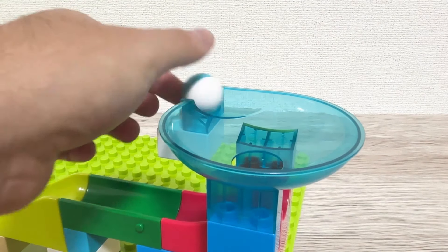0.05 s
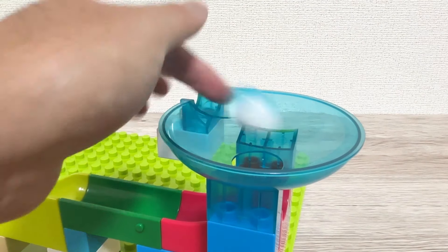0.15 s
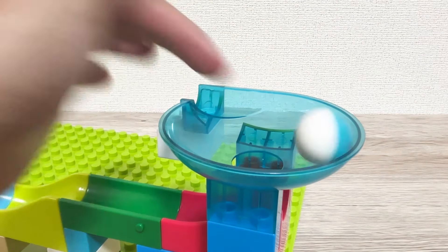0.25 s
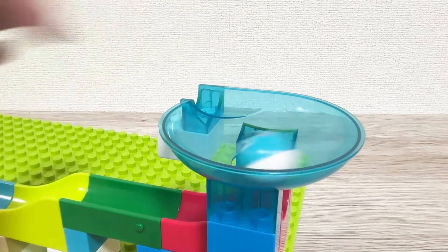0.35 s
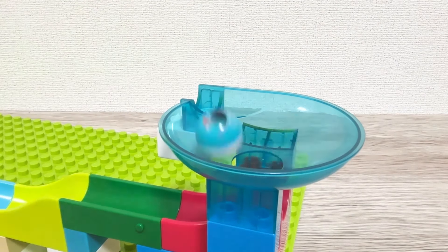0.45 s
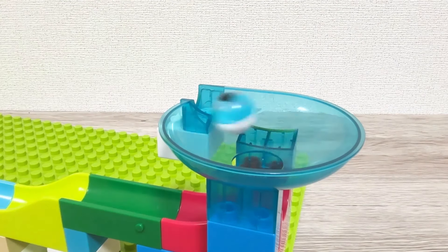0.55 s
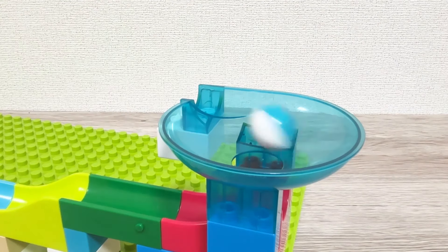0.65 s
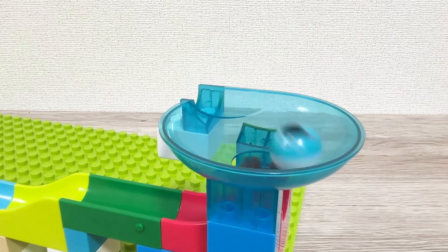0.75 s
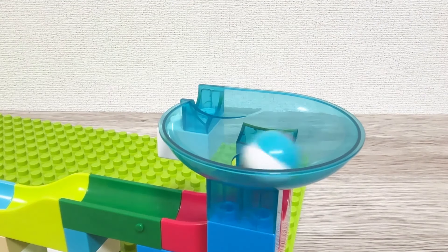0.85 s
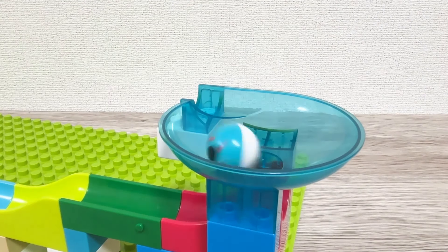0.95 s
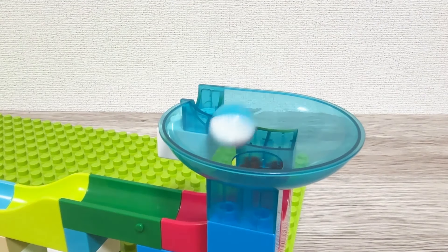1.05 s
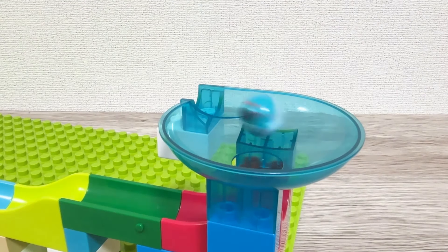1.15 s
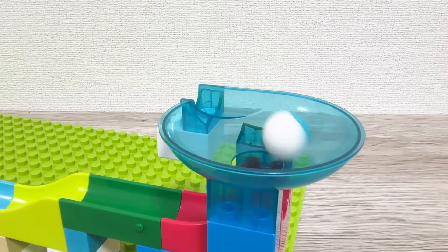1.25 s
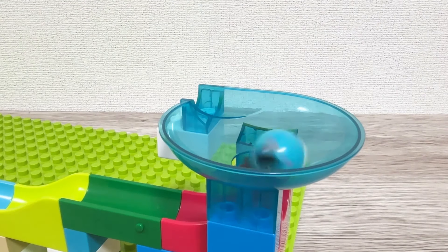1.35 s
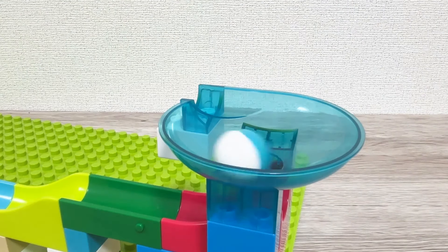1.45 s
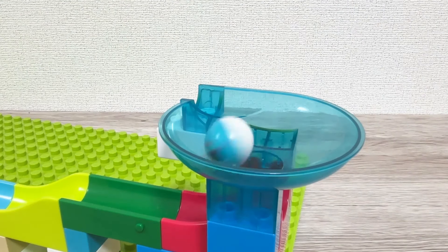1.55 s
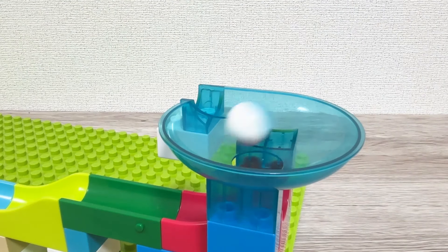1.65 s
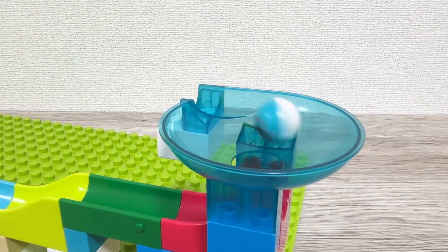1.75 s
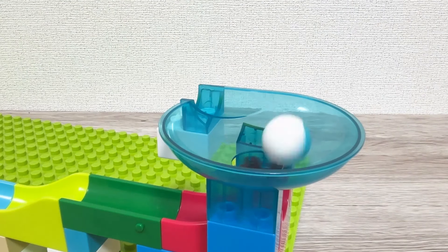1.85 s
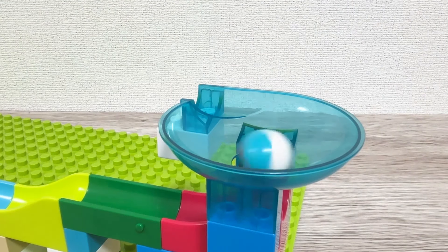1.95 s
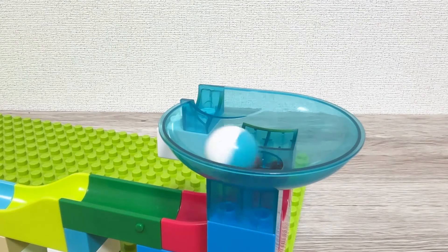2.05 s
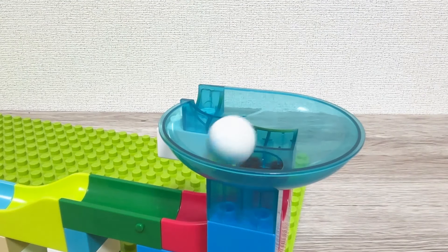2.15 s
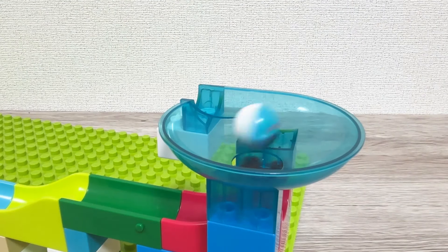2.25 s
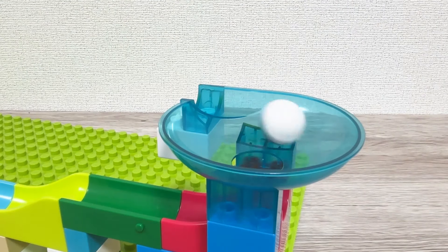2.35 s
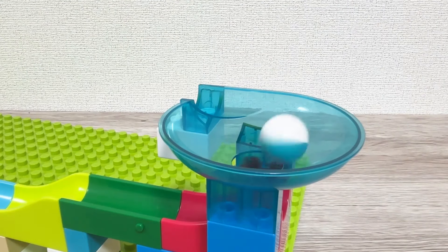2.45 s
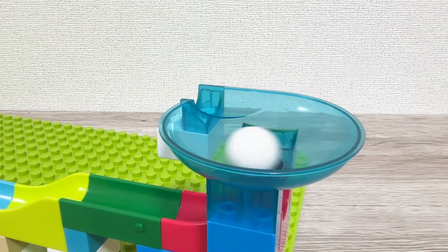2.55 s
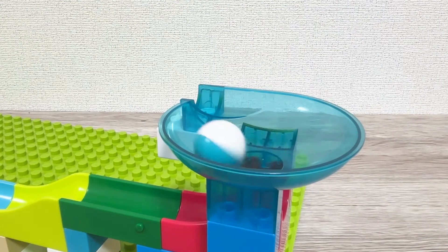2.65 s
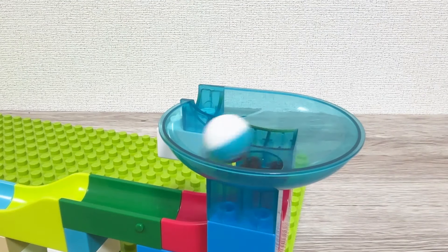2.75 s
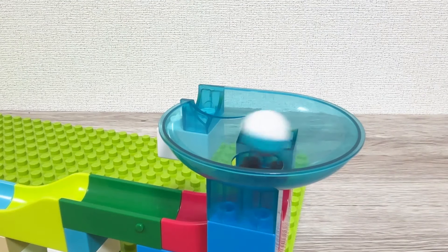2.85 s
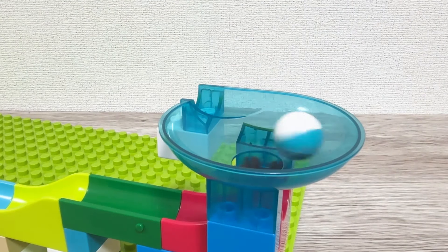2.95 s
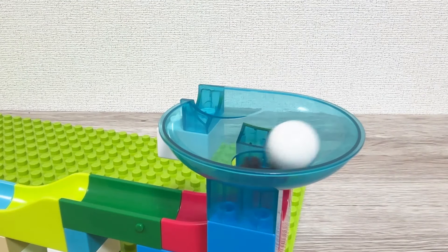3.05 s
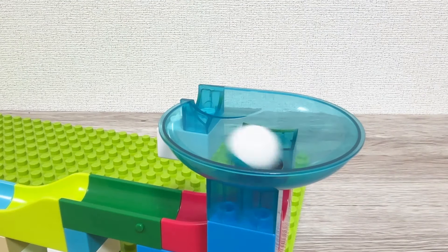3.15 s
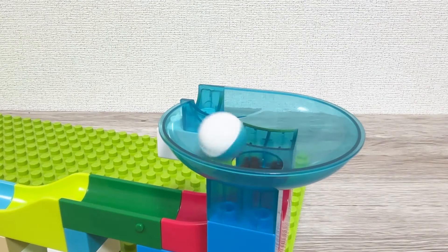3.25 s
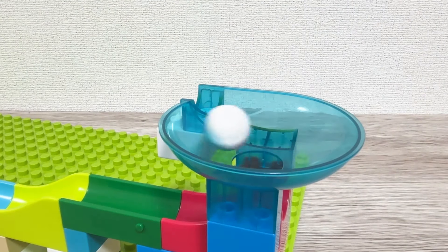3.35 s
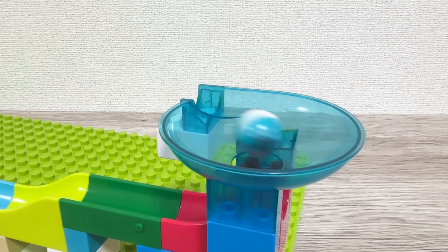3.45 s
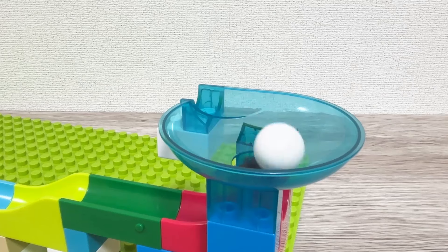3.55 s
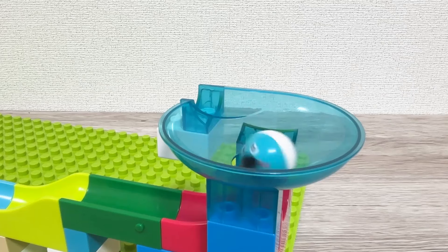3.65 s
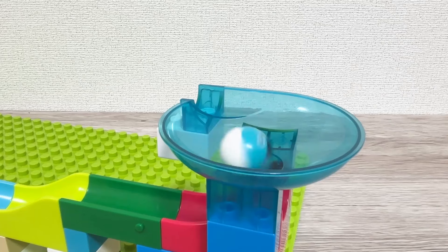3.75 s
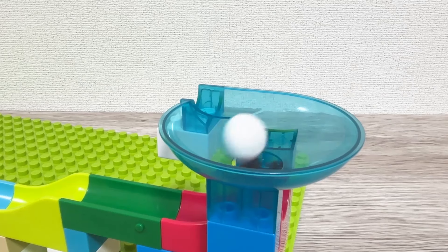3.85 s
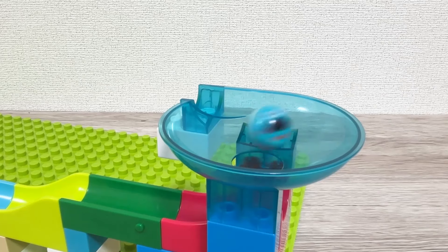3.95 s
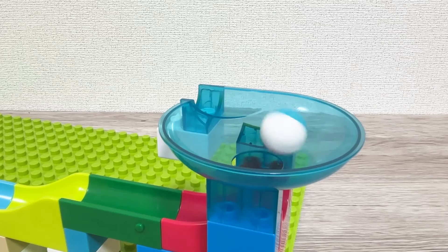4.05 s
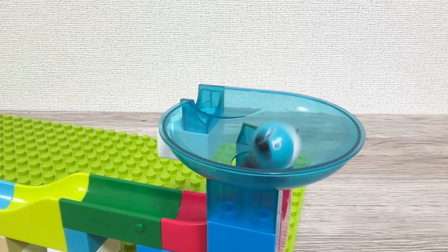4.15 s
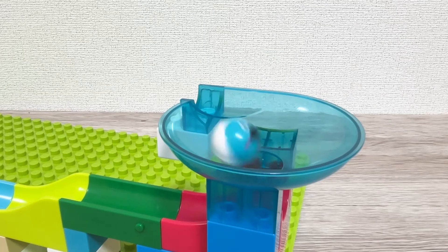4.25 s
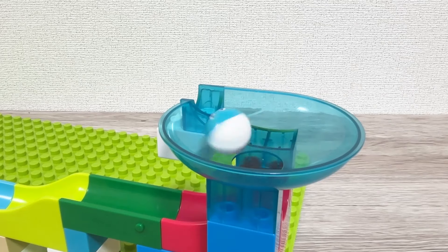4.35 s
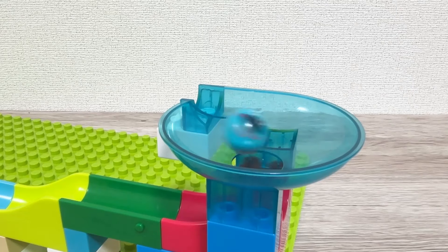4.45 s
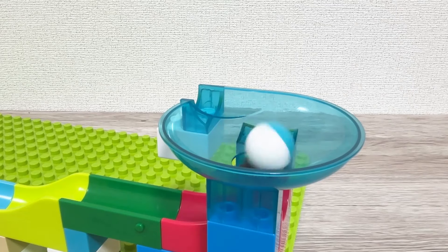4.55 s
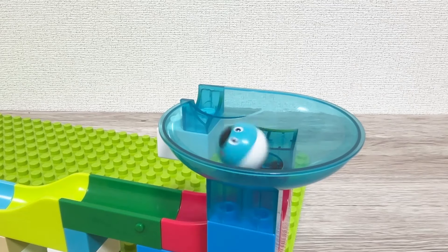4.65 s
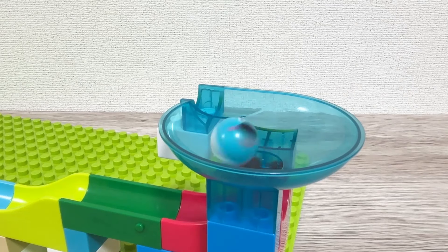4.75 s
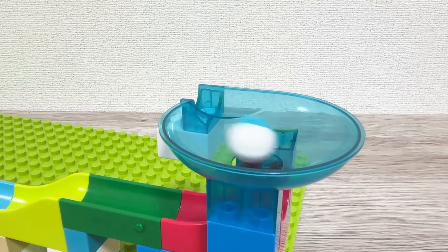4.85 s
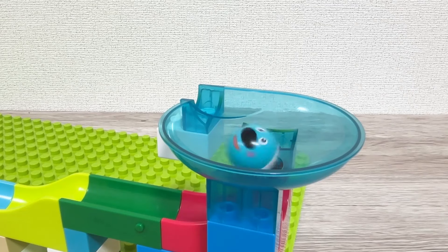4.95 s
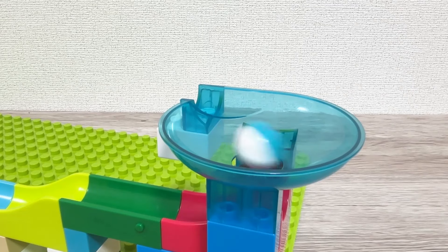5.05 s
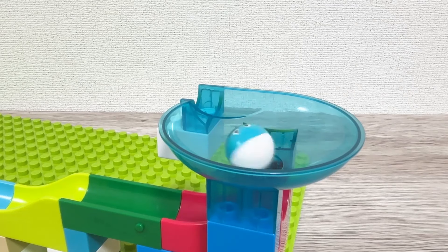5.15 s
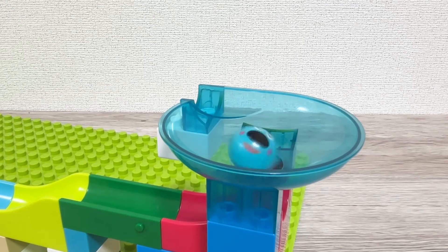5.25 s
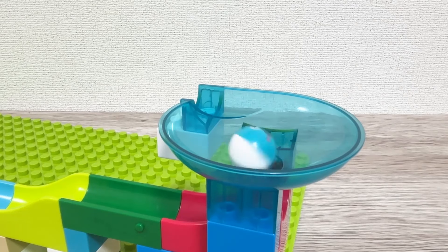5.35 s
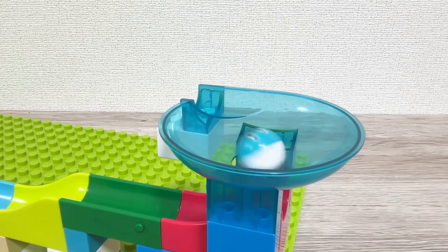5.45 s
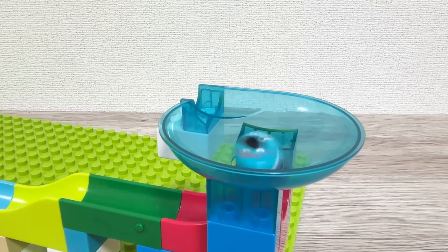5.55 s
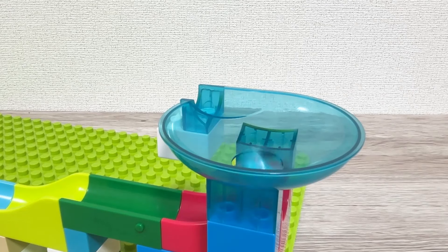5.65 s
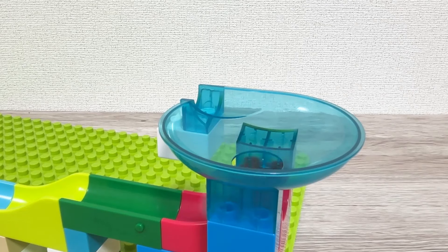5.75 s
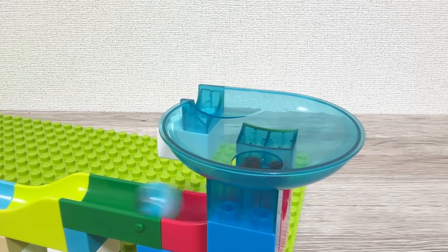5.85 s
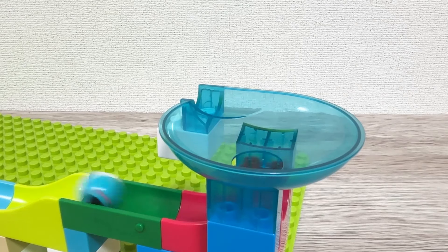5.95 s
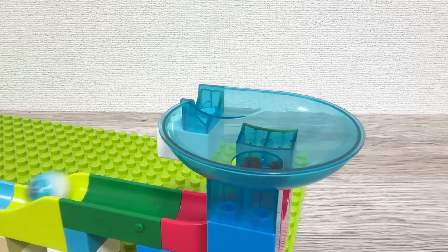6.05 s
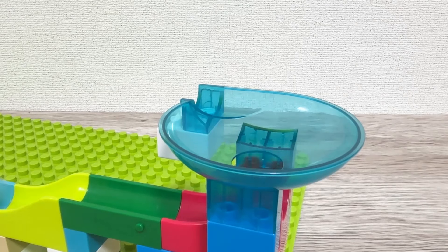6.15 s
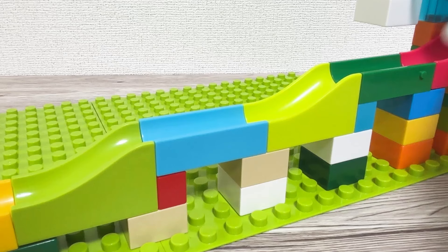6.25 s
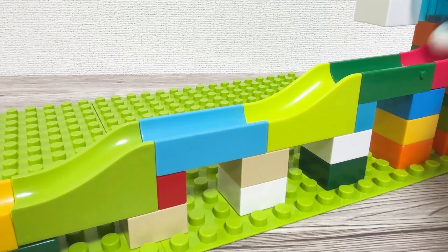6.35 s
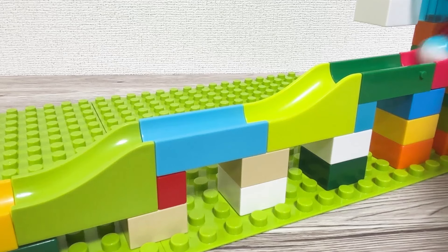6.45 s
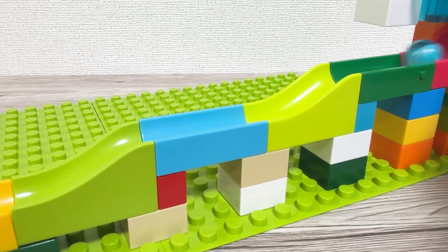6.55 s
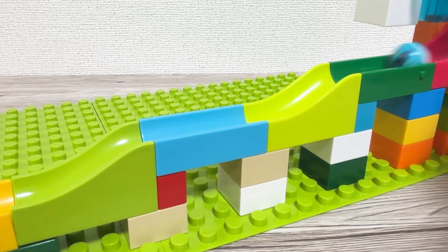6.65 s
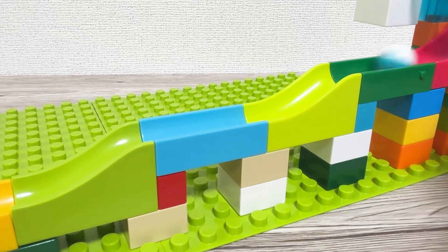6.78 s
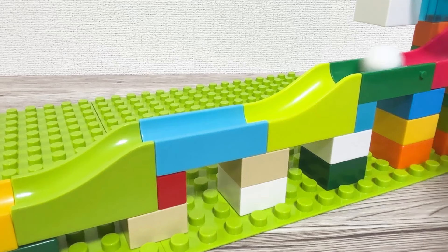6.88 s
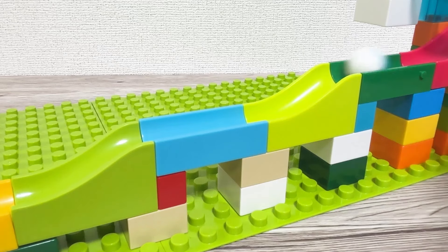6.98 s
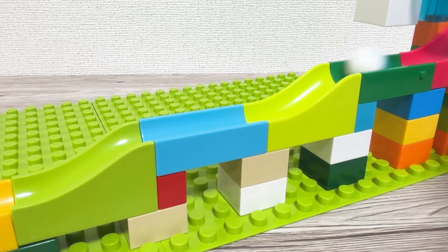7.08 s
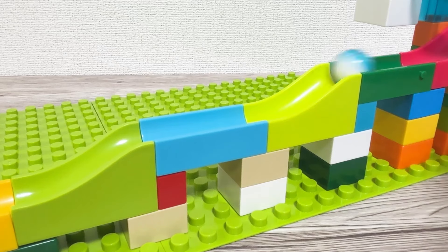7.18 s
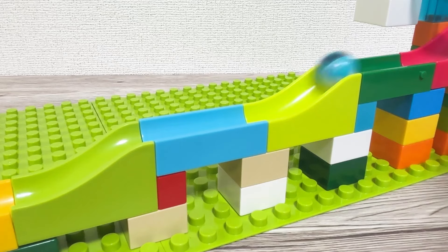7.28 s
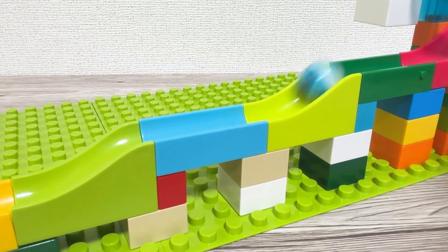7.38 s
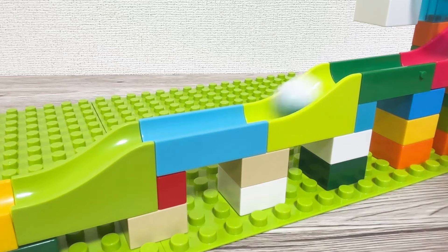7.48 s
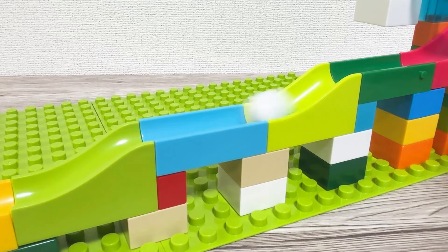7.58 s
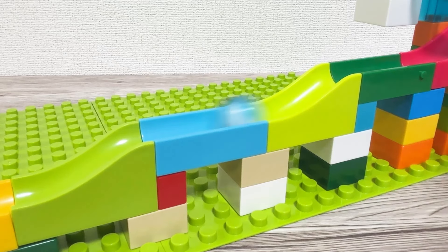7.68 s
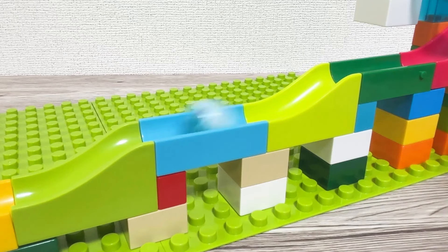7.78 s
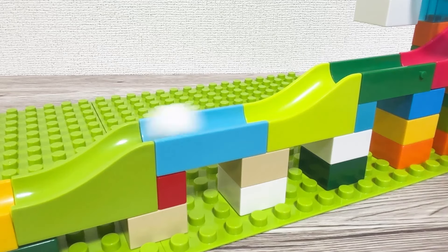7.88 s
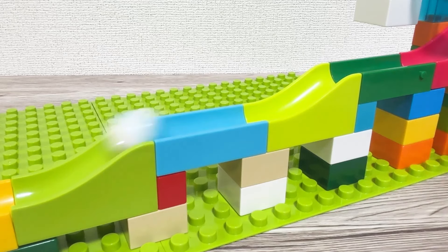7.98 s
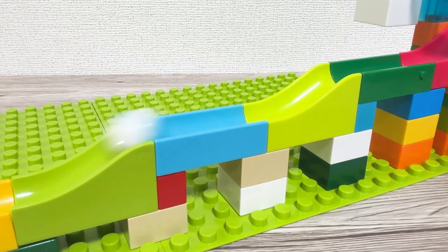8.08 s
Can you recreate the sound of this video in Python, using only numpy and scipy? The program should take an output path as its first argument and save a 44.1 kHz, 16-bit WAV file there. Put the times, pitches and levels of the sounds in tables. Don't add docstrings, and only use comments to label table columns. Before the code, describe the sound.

Sharp plastic landing knocks, swirling hollow rolling that tightens, a loud rattling drop, then deeper, stretched clunks and rumble as the ball descends a track.

```python
import sys
import numpy as np
from scipy import signal
from scipy.fft import rfft, irfft, next_fast_len
from scipy.io import wavfile
from scipy.ndimage import uniform_filter1d

SR = 44100
rng = np.random.default_rng(int(sys.argv[2]) if len(sys.argv) > 2 else 0)


def int16_out(signal):
    q = np.round(np.clip(np.atleast_2d(signal).T, -1, 1) * 32767)
    wavfile.write(sys.argv[1], SR, q.astype(np.int16))


def gain_from_decibels(decibels):
    exponent = np.asarray(decibels, float) / 20
    return 10 ** exponent


N = 358091
CUT_S = 6.241
HIT_LEN = 4096
PRESS_DB = -60

FUNNEL_EDGES_HZ, CHUTE_EDGES_HZ, SLOW_EDGES_HZ = (600 - 40, 1550, 6000), (600, 2400, 6000), (400, 1400, 3000)
FUNNEL_LAW = dict(clack_db=-68.5, clack_slope=1.5, rumble_db=-65.5, rumble_slope=0.6)
LAP_LAW = dict(clack_db=-69.5, clack_slope=1.04, clack_width=1.11)

# (centre [Hz], width [Hz], gain over colour [dB])
FUNNEL_MODES = [(82.4, 51, 8), (175, 38, 11), (260.8, 4.7, 15.5), (400.6, 7.43, 19), (440, 28, -8),
                (591, 100, 13.5), (1100, 28.7, 13), (1380, 39, 17), (1800, 140, 0.5), (2110, 120, -2),
                (2950, 330, 0), (3620, 24, -8.5), (4088, 15, 5), (4580, 610, -4.5), (6147, 120, -13),
                (6460, 47, -9), (7780, 82, 8.5), (8554, 500, 7)]
# (centre [Hz], width [Hz], gain over colour [dB])
THROAT_MODES = [(87.7, 34, 6.5), (182.6, 16, 14), (256, 28, 10), (423, 25.4, 9.5), (620, 76.5, 7.5),
                (1080, 62, 17), (1400, 23, 24), (2100, 102, 6.5), (2900, 260, -3.5), (3915, 160, -0.5),
                (4700, 150, 6), (5950, 65, -6.5), (6370, 48, -5), (7910, 180, -2.5)]
# (frequency [Hz], level [dB])
FUNNEL_COLOUR = [(35, -44), (60, -10.5), (177, -4.5), (774, -12), (1100, -10.5), (1700, -21), (2950, -14),
                 (9000, -29), (10200, -21), (11100, -31), (12700, -28), (16400, -30)]
# (frequency [Hz], level [dB])
CHUTE_COLOUR = [(35, -46), (60, -16), (912, -14.5), (1390, -14), (1800, -14), (3310, -7.5), (9980, -1.5),
                (13900, -9), (16400, -10)]
# (time [s], level [dB], width [ms])
LAPS = [(.72, -56, 62), (.97, -57.5, 46), (1.29, -60, 45), (1.59, -55.5, 49), (1.91, -60.5, 43),
        (2.26, -60.5, 36), (2.55, -59.5, 47), (2.859, -63.5, 66), (3.17, -65, 71), (3.492, -58, 49),
        (3.91, -59, 43), (4.222, -48, 35), (4.59, -51, 39.6), (4.901, -48, 17.3), (5.092, -46, 29.6),
        (5.216, -51.5, 82)]


def colour(hz, points):
    f, db = np.transpose(points)
    return gain_from_decibels(np.interp(np.log(hz + 1), np.log(f), db, right=-120))


def ring(hz, centre_hz, width_hz):
    return 1j * hz * width_hz / (centre_hz ** 2 - hz ** 2 + 1j * hz * width_hz)


def bands(hz, edges_hz):
    steps = [1 / (1 + (e / (hz + 1)) ** 8) for e in edges_hz]
    return -np.diff([1 + 0 * hz, *steps, 0 * hz], axis=0)


def bump(u):
    return np.exp(-u ** 2 / 2)


def ports(noise, hz, alike_hz, share):
    mid, side = rfft(noise)
    return mid + share * side * np.sqrt(hz / (hz + alike_hz)) * np.array([[1], [-1]])


def patchy(x, patch_db, smooth_hz, size):
    hz, _, z = signal.stft(x, SR, nperseg=512)
    cloud = rng.standard_normal(z.shape[1:])
    cloud = uniform_filter1d(uniform_filter1d(cloud, size[0], axis=0), size[1], axis=1)
    cloud = cloud / cloud.std() * (hz / (hz + smooth_hz))[:, None]
    return signal.istft(z * gain_from_decibels(patch_db * cloud), nperseg=512)[1][:, :x.shape[1]]


def pressed(curve, clack_db, clack_slope, rumble_db, rumble_slope):
    return [(s, db, clack_db + clack_slope * (db - PRESS_DB), rumble_db + rumble_slope * (db - PRESS_DB))
            for s, db in curve]


def leaning(laps, clack_db, clack_slope, clack_width):
    return [(s, db, clack_db + clack_slope * (db - PRESS_DB), ms, ms * clack_width) for s, db, ms in laps]


def rolling(curve, laps, modes, points, edges_hz, grains_per_s, grain_db, hiss_db, lap_rumble_db, swish_db):
    # (time [s], level [dB], width [ms])
    shudders = [(0.349, -44, 31), (1.24, -52.5, 19), (1.52, -70, 11), (1.69, -55.5, 25), (4.6, -47.5, 38),
                (5.1, -56, 13), (5.235, -49.5, 18), (5.47, -50.5, 89), (6.57, -43.5, 31), (5.75, -43, 94),
                (6.45, -49, 83), (6.2, -57, 57)]
    s, body_db, clack_db, rumble_db = np.transpose(curve)
    i = int(s[0] * SR)
    n = next_fast_len(int(s[-1] * SR) - i)
    hz, t = np.fft.rfftfreq(n, 1 / SR), (i + np.arange(n)) / SR

    body = sum(gain_from_decibels(db) * bump((t - at) * 1000 / ms) for at, db, _, ms, _ in laps)
    clack = sum(gain_from_decibels(db) * bump((t - at) * 1000 / ms + 0.084) for at, _, db, _, ms in laps)
    swish = gain_from_decibels(swish_db) * sum(bump(((t - lap[0]) * 1000 + 42) / 22) for lap in laps)
    shudder = sum(gain_from_decibels(db) * bump((t - at) * 1000 / ms) for at, db, ms in shudders)
    rumble = np.hypot(gain_from_decibels(np.interp(t, s, rumble_db)) + shudder, gain_from_decibels(lap_rumble_db) * clack)
    body = np.hypot(body, gain_from_decibels(np.interp(t, s, body_db)))
    clack = np.hypot(clack, gain_from_decibels(np.interp(t, s, clack_db)))
    hiss = np.hypot(clack * gain_from_decibels(hiss_db), swish)

    strengths = gain_from_decibels(grain_db * np.minimum(rng.exponential(size=n), 3))
    grains = (rng.random(n) < grains_per_s / SR) * strengths
    both = ports(rng.standard_normal((2, n)) * uniform_filter1d(grains, size=60), hz, 1200, 0.7)
    both = rfft(patchy(irfft(both, n), 5.0, 350, size=(3, 7)))
    both = both * colour(hz, points) * (1 + sum(gain_from_decibels(g) * ring(hz, f, w) for f, w, g in modes))
    out = np.zeros((2, N + n))
    for band, gain in zip(bands(hz, edges_hz), (rumble, body, clack, hiss)):
        part = irfft(both * band, n)
        waver = np.repeat(rng.standard_normal(n // 600 + 1), 600)[:n]
        waver = uniform_filter1d(waver, size=600)
        out[:, i:i + n] += part / part.mean(axis=0).std() * gain * gain_from_decibels(2.0 * waver) * (t < s[-1])
    return out[:, :N]


def touched(hits, contact_ms, shorter, tick_db, tick_slope):
    return [(s, db, bright, tick_db + tick_slope * bright, hz, contact_ms * gain_from_decibels(shorter * min(-20 - db, 0)))
            for s, db, bright, hz in hits]


def knocks(hits, modes, points, edges_hz, tick_s, rise_s, tick_db, ring_hz, ring_db, thud_db, scatter_db):
    out = np.zeros((2, N + HIT_LEN))
    hz, t = np.fft.rfftfreq(HIT_LEN, 1 / SR), np.arange(HIT_LEN) / SR
    lead = 256
    split = bands(hz, edges_hz) * colour(hz, points) * np.exp(-2j * np.pi * hz * lead / SR)
    rings = np.array([gain_from_decibels(g) * ring(hz, f, w) for f, w, g in modes])
    tick_shape = np.exp(-t / tick_s) * (1 - np.exp(-(t / rise_s) ** 2))
    upper = hz / (hz + edges_hz[1])
    treble_fade = np.exp(-np.maximum(t - lead / SR, 0) / (0.0077 * 6000 / edges_hz[2]))
    for s, db, clack_db, top_db, own_hz, contact_ms in hits:
        noise = rng.standard_normal((2, HIT_LEN))
        luck = rng.standard_normal((2, len(modes)))
        u = t / (max(contact_ms, .5) / 1000)
        scrape = ports(noise * u * np.exp(1 - u), hz, 1500, 0.4) / (1 + (hz / edges_hz[2]) ** 2)
        tick = ports(noise * tick_shape, hz, 1500, 0.7) * upper
        own_ring = gain_from_decibels(ring_db) * ring(hz, own_hz, ring_hz * max(own_hz / 1000, 1))
        body = 1 + gain_from_decibels(scatter_db * luck) @ rings + own_ring
        spot = np.interp(hz / edges_hz[2], np.linspace(0, 4, 40), noise[0, -40:])
        body = body * gain_from_decibels(6 * spot * upper)
        parts = irfft(split[:, None] * (scrape + gain_from_decibels(tick_db) * tick) * body)
        parts[-1] *= treble_fade
        peaks = np.abs(parts.mean(axis=1)).max(axis=1)
        gains = gain_from_decibels(db + np.array([thud_db, 0, clack_db, top_db])) / peaks
        i = int(s * SR) - lead
        out[:, i:i + HIT_LEN] += np.tensordot(gains, parts, 1)
    return out[:, :N]


def pings(rows, rise_ms, right_lag_rad):
    out = np.zeros((2, N + 2 * HIT_LEN))
    t = np.arange(2 * HIT_LEN) / SR
    for s, hz, db, t60_ms in rows:
        shape = gain_from_decibels(db - 60000 * t / max(t60_ms, 5)) * (1 - np.exp(-1000 * t / rise_ms))
        i = int(s * SR)
        out[:, i:i + len(t)] += shape * np.sin(2 * np.pi * hz * t - np.array([[0], [right_lag_rad]]))
    return out[:, :N]


def room(x, t60_s, treble_t60_s, wet_db, treble_db, gap_s):
    t = np.arange(int(.9 * SR)) / SR
    noise = ports(rng.standard_normal((2, len(t))), np.fft.rfftfreq(len(t), 1 / SR), 300, 1.0)
    noise = irfft(noise, len(t))
    low = uniform_filter1d(noise, size=12)
    tail = low * gain_from_decibels(-60 * t / t60_s) + (noise - low) * gain_from_decibels(treble_db - 60 * t / treble_t60_s)
    tail = tail * (t > gap_s)
    return x + gain_from_decibels(wet_db) * signal.fftconvolve(x.mean(axis=0, keepdims=True), tail, axes=1)[:, :N]


def place(x, pan_db, bass_cut_hz, alike_hz, step_hz, turn_hz, share, lead_rad, lead_hz):
    n = next_fast_len(N)
    hz = np.fft.rfftfreq(n, 1 / SR)
    sign = np.array([[.5], [-.5]])
    alike = share / (1 + (alike_hz / (hz + 1)) ** 12)
    skew = np.exp(-1j * sign * lead_rad * np.exp(-2 * np.log((hz + 1) / lead_hz) ** 2))
    both = rfft(x.mean(axis=0), n) * np.exp(-2j * np.pi * sign * (hz - step_hz) / turn_hz)
    z = (1 - alike) * rfft(x * gain_from_decibels(sign * pan_db), n) * skew + alike * both * gain_from_decibels(3.0)
    return irfft(z * (1 - .85 / (1 + (hz / bass_cut_hz) ** 4)), n)[:, :N]


def room_tone():
    # (frequency [Hz], level [dB])
    tone_colour = [(12, -33.5), (20, 14.5), (700, -3.5), (1150, -27.5), (1480, -29.5), (1860, -40),
                   (3530, -28), (8180, -30), (14000, -29)]
    hz = np.fft.rfftfreq(N, 1 / SR)
    x = irfft(ports(rng.standard_normal((2, N)), hz, 900, 1.0) * colour(hz, tone_colour), N)
    x = x / x.mean(axis=0).std() * gain_from_decibels(-64)
    return patchy(x, 2.6, 500, size=(2, 24))


def funnel_roll():
    # (time [s], level [dB])
    press = [(0.0, -68.5), (.1, -69), (.165, -59.5), (.2, -40.5), (.36, -55), (.54, -59.5), (.74, -68),
             (1.09, -58.5), (1.99, -63.5), (2.58, -71), (3.46, -102.5), (3.64, -69.5), (3.92, -68.5),
             (4.06, -84)]
    return rolling(pressed(press, **FUNNEL_LAW), leaning(LAPS, **LAP_LAW), FUNNEL_MODES, FUNNEL_COLOUR,
                   FUNNEL_EDGES_HZ, grains_per_s=6700, grain_db=1.3, hiss_db=-10.5, lap_rumble_db=8.8,
                   swish_db=-76.0)


def drop_knocks():
    # (time [s], body peak [dB], brightness re body [dB], loudest ring [Hz])
    drops = [
        (.129, -52.5, -1, 2900),
        (.174, -23.5, 15, 3430),
        (.189, -24, 11, 2883),
        (.257, -35, 3, 2810),
        (.293, -42.5, 18, 4700),
        (.323, -36.5, 18.5, 4500),
    ]
    held = [(f, w * 3, g + 0.5) for f, w, g in FUNNEL_MODES]
    rows = touched(drops, contact_ms=3.5, shorter=-0.6, tick_db=-10.5, tick_slope=1.2632)
    return knocks(rows, held, FUNNEL_COLOUR, FUNNEL_EDGES_HZ, tick_s=0.0018, rise_s=0.00054, tick_db=14,
                  ring_hz=100, ring_db=9.1, thud_db=-8.0, scatter_db=1.86)


def near_pings():
    # (time [s], frequency [Hz], peak [dB], t60 [ms])
    near_modes = [(.174, 3330, -16.5, 33), (.174, 7860, -24, 15), (.189, 2900, -22, 60),
                  (.3225, 3120, -16, 16), (.642, 3380, -31, 27), (1.034, 3020, -50, 61),
                  (1.09, 3400, -48.5, 140), (1.222, 2650, -48, 60), (1.37, 2600, -40, 52),
                  (1.433, 2950, -42, 36), (1.508, 3020, -62, 65), (5.098, 3860, -36.5, 42),
                  (5.411, 4700, -29, 25), (5.222, 180, -33.5, 200), (5.443, 3000, -27, 38),
                  (5.513, 1100, -29.5, 87), (5.541, 2720, -22, 27), (5.592, 1980, -31.5, 19),
                  (5.684, 6430, -25.5, 24), (5.763, 5530, -24.5, 36), (5.7965, 9100, -17.5, 11),
                  (5.7965, 12000, -17, 19), (5.7965, 14200, -17.5, 16), (5.851, 13370, -30.5, 31),
                  (5.851, 3370, -27, 30), (5.9855, 2630, -18, 21), (6.0075, 2080, -27.5, 61),
                  (5.8215, 3450, -21, 52)]
    return pings(near_modes, rise_ms=0.35, right_lag_rad=0.48)


def seam_knocks():
    # (time [s], body peak [dB], brightness re body [dB], loudest ring [Hz])
    seams = [(.614, -44.5, -7, 1170), (.641, -36, 3, 1270), (.94, -39, -9, 700), (1.031, -47, 1, 1370),
             (1.088, -39, -2.5, 1300), (1.118, -48, -1, 1230), (1.21, -37, -5, 1100),
             (1.22, -38.5, 5, 1050), (1.231, -38.5, -4, 1380), (1.343, -50.5, -2, 1100),
             (1.37, -37.5, -3, 1080), (1.384, -40, -3.5, 1050), (1.431, -39, -4.5, 1400),
             (1.494, -36, -7, 1050), (1.51, -36, -2, 1100), (1.58, -51, 1.5, 1100), (1.592, -51, -15, 1100),
             (1.654, -37.5, -2.5, 1260), (1.672, -37.5, -6, 1160), (1.802, -42.5, -8, 1280),
             (1.902, -73, 18.5, 670), (1.956, -37.5, -6.5, 644), (2.258, -41.5, -12, 1100),
             (2.292, -44, -3.5, 1250), (2.541, -47.5, -11, 1380), (2.847, -41.5, -15.5, 1100),
             (2.87, -46.5, -27, 1380), (3.141, -50, -18, 1100), (3.17, -46.5, -26, 1380),
             (3.436, -71, -31.5, 613), (3.461, -39.5, -42, 1090), (3.591, -48, -7, 1100),
             (3.65, -48.5, -3, 750), (3.732, -43, -22.5, 634), (3.828, -49.5, 5.5, 650),
             (3.902, -38.5, -31, 1140)]
    # (frequency [Hz], level [dB])
    seam_colour = [(35, -46), (60, -15), (177, -2.5), (774, -11.5), (1100, -5), (1600, -15.5), (2700, -12),
                   (3700, -18.5), (9000, -26.5), (10200, -27), (12700, -26), (16400, -16.5)]
    rows = touched(seams, contact_ms=6, shorter=0, tick_db=-6, tick_slope=1.37)
    return knocks(rows, FUNNEL_MODES, seam_colour, FUNNEL_EDGES_HZ, tick_s=0.005, rise_s=0.0021, tick_db=7,
                  ring_hz=160, ring_db=12.5, thud_db=-9.0, scatter_db=6.6)


def throat_roll():
    # (time [s], level [dB])
    press = [(4.06, -72), (4.4, -85.5), (4.7, -70), (4.84, -99), (4.98, -56), (5.05, -86), (5.16, -70),
             (5.28, -50.5), (5.38, -52), (5.55, -41), (5.63, -40), (5.68, -50.5)]
    return rolling(pressed(press, **FUNNEL_LAW), leaning(LAPS, **LAP_LAW), THROAT_MODES, FUNNEL_COLOUR,
                   FUNNEL_EDGES_HZ, grains_per_s=8600, grain_db=7.4, hiss_db=-11.0, lap_rumble_db=7.3,
                   swish_db=-98)


def spin_knocks():
    # (time [s], body peak [dB], brightness re body [dB], loudest ring [Hz])
    spins = [(4.181, -55.5, 12, 1100), (4.525, -37, -15.5, 1230), (4.559, -43, 5, 1080),
             (4.571, -51.5, 16, 1080), (4.59, -39, -6.5, 1400), (4.607, -54.5, -23, 1100),
             (4.867, -39, -5.5, 1120), (4.902, -41.5, 3, 1400), (5.112, -40, -11.5, 1400),
             (5.18, -52, 14.5, 2900), (5.218, -43, 9.5, 1400), (5.235, -42.5, -11, 2100),
             (5.478, -44.5, 9, 1100), (5.594, -31.5, 3.5, 1100), (5.617, -30, 6, 2900),
             (5.642, -43, 14.5, 2900), (5.656, -50.5, 1, 3100), (4.888, -34.5, -7.5, 1380),
             (5.064, -32.5, 0.5, 1050), (5.097, -47.5, 15.5, 1400), (5.194, -29.5, -1.5, 1400),
             (5.202, -32.5, 5.5, 1140), (5.314, -34.5, 3, 1390), (5.341, -28.5, 0, 1050),
             (5.39, -43, 12, 1050), (5.411, -30, 5.5, 4700), (5.445, -53, 14, 2990),
             (5.463, -32, 5.5, 1143), (5.496, -34.5, 6, 1400), (5.517, -34.5, -0.5, 1100),
             (5.545, -60, -12.5, 1095), (5.566, -40.5, 7, 1084), (5.584, -38, 11, 2580),
             (5.604, -36, 5.5, 1160), (5.629, -38, 9, 2786)]
    rows = touched(spins, contact_ms=10, shorter=0, tick_db=-2.5, tick_slope=1.29)
    return knocks(rows, THROAT_MODES, FUNNEL_COLOUR, FUNNEL_EDGES_HZ, tick_s=0.009, rise_s=0.0023, tick_db=8.7,
                  ring_hz=100, ring_db=7.2, thud_db=-12.0, scatter_db=6.9)


def hole_knocks():
    # (time [s], body peak [dB], brightness re body [dB], loudest ring [Hz])
    rattles = [(5.679, -27, -2.5, 1210), (5.684, -11, -4, 1050), (5.688, -17.5, -9.5, 2040),
               (5.71, -37, 1.5, 2100), (5.749, -35, -8.5, 1380), (5.768, -28, 3.5, 1380),
               (5.81, -44.5, -10, 3400), (5.833, -34.5, -3, 3400), (5.843, -35.5, 0.5, 3400),
               (5.763, -16, -4.5, 1380), (5.7965, -15.5, 6.5, 3290), (5.821, -21.5, 2, 3400),
               (5.851, -32, 12, 2570), (5.868, -32, 0.5, 3450), (5.985, -32, 1.5, 2740),
               (6.008, -31.5, -38, 2080), (6.0595, -41, -7, 2720), (6.1, -37, -7.5, 1770),
               (6.138, -33.5, -6, 2950), (6.22, -38.5, -14, 2650)]
    # (centre [Hz], width [Hz], gain over colour [dB])
    chute_modes = [(1370, 83, 2.6), (2080, 36.4, 3), (2720, 200, 2), (3350, 86, 11.5), (3400, 160, 8.3),
                   (14200, 630, 8.7), (5420, 300, 4.7), (12000, 190, 3.1)]
    rows = touched(rattles, contact_ms=6.5, shorter=3.4, tick_db=-2.5, tick_slope=0.57)
    return knocks(rows, chute_modes, CHUTE_COLOUR, CHUTE_EDGES_HZ, tick_s=0.0022, rise_s=0.0017, tick_db=3.87,
                  ring_hz=67, ring_db=19.0, thud_db=-18.5, scatter_db=5.7)


def chute_roll():
    # (time [s], level [dB])
    press = [
        (5.68, -42.5),
        (5.986, -56.5),
        (6.25, -49),
    ]
    # (centre [Hz], width [Hz], gain over colour [dB])
    exit_modes = [(174, 35, 48.8), (421, 51, 1.97), (1400, 110, 3.7), (2080, 59, 9), (2400, 210, 25.5),
                  (4770, 160, 3.6)]
    force = pressed(press, clack_db=-65, clack_slope=0.74, rumble_db=-72.5, rumble_slope=1.18)
    return rolling(force, [], exit_modes, CHUTE_COLOUR, CHUTE_EDGES_HZ, grains_per_s=4300, grain_db=2.2,
                   hiss_db=-11.0, lap_rumble_db=-4, swish_db=-120)


def slowed_chute():
    # (time [s], body peak [dB], brightness re body [dB], loudest ring [Hz])
    slow_hits = [(6.272, -33, -5, 694), (6.297, -15, -8, 685), (6.304, -25, -0.5, 910),
                 (6.312, -24.5, -15.5, 515), (6.385, -31, -26, 1100), (6.412, -22, -16, 1050),
                 (6.424, -19, -20, 1100), (6.444, -37, -8, 1050), (6.475, -24.5, -13, 1034),
                 (6.533, -25, -3, 1000), (6.55, -29, -8, 1030), (6.93, -29.5, -20, 620),
                 (7.066, -31, -25, 824), (7.108, -42, -26.5, 870), (7.312, -23.5, -10.5, 850),
                 (7.347, -28, -23, 620), (7.41, -29.5, -12.5, 820), (7.445, -28.5, -15, 705),
                 (7.557, -21.5, -17, 1010), (7.908, -27, -14, 890), (6.321, -20, -5.5, 523),
                 (6.4, -9, -6.5, 945), (6.46, -15.5, -16.5, 956), (6.502, -29, -11, 1020),
                 (6.52, -19.5, -2, 1050), (6.577, -30, 0.5, 720), (6.813, -40, -13.5, 656),
                 (6.884, -44, 3.5, 627), (6.918, -33.5, -4.5, 657), (7.056, -24.5, -15, 960),
                 (7.083, -27, -25.5, 866), (7.261, -33, -9, 537), (7.304, -21.5, -11.5, 634),
                 (7.333, -22, -17.5, 620), (7.428, -37.5, -3, 556), (7.484, -21.5, -9, 930),
                 (7.494, -22, -9.5, 810), (7.551, -22.5, -8, 1906), (7.699, -24, -10, 750),
                 (7.732, -28.5, -10, 716), (7.898, -23, -4.5, 910), (8.006, -31.5, -7, 870),
                 (8.039, -53.5, 8, 790), (8.072, -27.5, -9.5, 925), (8.097, -28, -26, 950)]
    # (time [s], frequency [Hz], peak [dB], t60 [ms])
    slow_rings = [(6.297, 1600, -22, 70), (6.298, 900, -15.5, 60), (6.4, 944, -1, 30),
                  (6.41, 1060, -18, 150), (6.519, 2400, -30, 80), (6.52, 1450, -23, 50),
                  (6.52, 270, -30, 150), (7.304, 790, -19.5, 50), (7.305, 2700, -39.5, 60),
                  (7.333, 1450, -30.5, 80), (7.495, 2300, -42, 90), (7.552, 1950, -28, 60),
                  (7.552, 1050, -19.5, 50), (7.556, 2680, -36, 40), (7.056, 1486, -35, 100),
                  (7.896, 1600, -25.5, 80), (7.896, 2350, -29.5, 60), (7.897, 898, -16.5, 40),
                  (8.072, 856, -24, 60), (7.896, 4100, -36.5, 70), (7.968, 964, -58, 50),
                  (8.059, 568, -31, 50)]
    # (time [s], level [dB])
    press = [(6.24, -34.5), (6.448, -46), (6.694, -51.5), (7.082, -58), (7.316, -54.5), (7.474, -44.5),
             (7.75, -49), (7.94, -53.5), (8.12, -40.5)]
    # (time [s], level [dB], width [ms])
    swells = [
        (6.831, -47.5, 35),
        (6.948, -55, 25),
        (7.36, -32.5, 30.5),
        (7.432, -35, 22),
    ]
    # (centre [Hz], width [Hz], gain over colour [dB])
    slow_modes = [(58.3, 13, 5.9), (167, 21, 1.6), (278, 15, 11), (437, 2.8, 10), (611, 27, 8),
                  (799, 65, 7.6), (1050, 21, 14.8), (1610, 16, 12), (1960, 9.5, 1.9), (2284, 150, 4.5),
                  (3800, 29, 2.8), (4260, 44, 2.2), (5640, 28, 1.5)]
    # (frequency [Hz], level [dB])
    slow_colour = [(18, -25.5), (30, -4.5), (271, -7.5), (331, -7), (771, -3), (2140, -26.5), (2340, -29.5),
                   (2990, -22.5), (4180, -24.5), (5460, -28), (6100, -53), (7930, -80), (13400, -120)]
    rows = touched(slow_hits, contact_ms=5, shorter=3, tick_db=-1, tick_slope=1.54)
    hits = knocks(rows, slow_modes, slow_colour, SLOW_EDGES_HZ, tick_s=0.0066, rise_s=0.0004, tick_db=6.9,
                  ring_hz=240, ring_db=21, thud_db=-12.5, scatter_db=2.7)
    hits = room(hits, t60_s=0.89, treble_t60_s=0.78, wet_db=-43.5, treble_db=-3.5, gap_s=0.0087)
    force = pressed(press, clack_db=-74.5, clack_slope=1.2544, rumble_db=-59, rumble_slope=0.8536)
    lean = leaning(swells, clack_db=-66, clack_slope=0.45, clack_width=0.89)
    roll = rolling(force, lean, slow_modes, slow_colour, SLOW_EDGES_HZ, grains_per_s=2500, grain_db=0.62,
                   hiss_db=-10.5, lap_rumble_db=1.5, swish_db=-120)
    return pings(slow_rings, rise_ms=0.87, right_lag_rad=.3) + hits + roll


def scene():
    # (time [s], left over right [dB])
    slow_pan = [
        (6.24, -3.8),
        (6.47, -4.2),
        (6.55, .3),
        (7.2, 1.5),
        (8.12, 4),
    ]
    t = np.arange(N) / SR
    near = room_tone() + funnel_roll() + throat_roll() + chute_roll() + near_pings()
    hits = drop_knocks() + seam_knocks() + spin_knocks() + hole_knocks()
    near = near + room(hits, t60_s=0.22, treble_t60_s=0.3, wet_db=-32.5, treble_db=-7.0, gap_s=0.00082)
    near = place(near, 2.8, bass_cut_hz=30, alike_hz=6000, step_hz=7000, turn_hz=5750, share=.95,
                 lead_rad=-1.6, lead_hz=3000)
    slow = place(slowed_chute(), np.interp(t, *np.transpose(slow_pan)), bass_cut_hz=35, alike_hz=2000,
                 step_hz=2245, turn_hz=1670, share=.93, lead_rad=-.8, lead_hz=900)
    fade = np.clip((t - CUT_S) / 0.063, 0, 1)
    return near * (1 - fade) ** 4 + np.sqrt(fade) * slow


def treble_gate(x, from_hz, quiet_db, masked_db, slow_hz, slow_db):
    hz, t, z = signal.stft(x, SR, nperseg=1024)
    group = np.arange(len(hz)) // 16
    power = np.add.reduceat((np.abs(z) ** 2).mean(axis=0), np.arange(0, len(hz), 16))
    quiet_db = quiet_db + slow_db * np.outer(hz[::16] > slow_hz, t > CUT_S)
    floor = gain_from_decibels(2 * quiet_db) + gain_from_decibels(2 * masked_db) * power.max(axis=0)
    margin_db = 10 * np.log10(power / floor + 1e-18)
    keep = np.where(hz[:, None] > from_hz, np.clip(margin_db[group] / 2, 0, 1), 1)
    return signal.istft(z * keep, SR, nperseg=1024)[1][:, :N]


def roll_off(x):
    return signal.sosfilt(signal.butter(12, 16480, fs=SR, output="sos"), x)


def record(dry):
    mix = treble_gate(dry, from_hz=2800, quiet_db=-97, masked_db=-47, slow_hz=4450, slow_db=16)
    return roll_off(mix)


dry = scene()
out = record(dry)
int16_out(out)
```